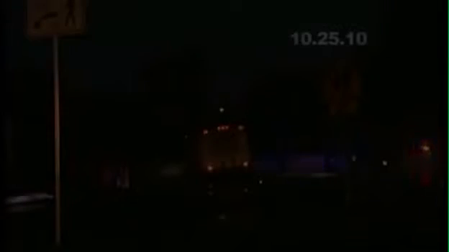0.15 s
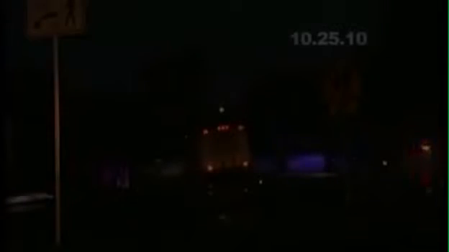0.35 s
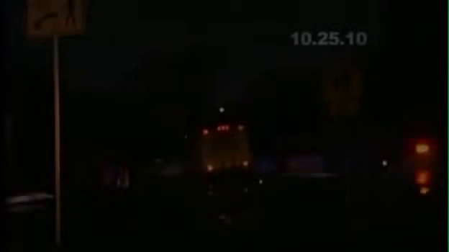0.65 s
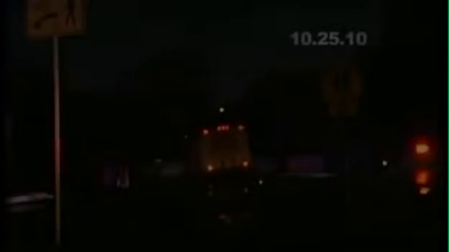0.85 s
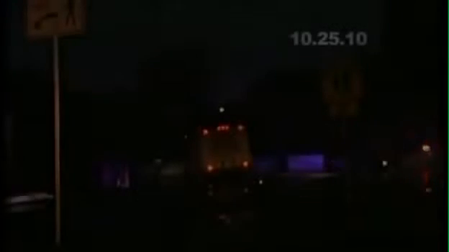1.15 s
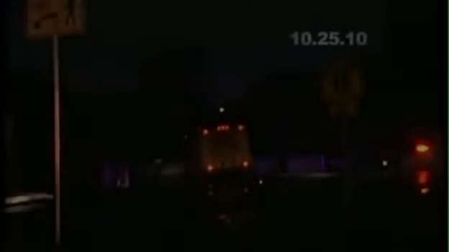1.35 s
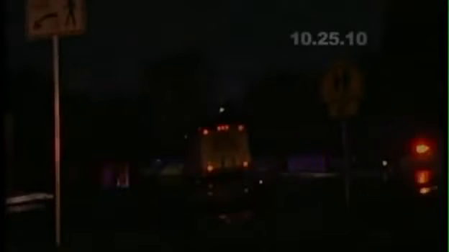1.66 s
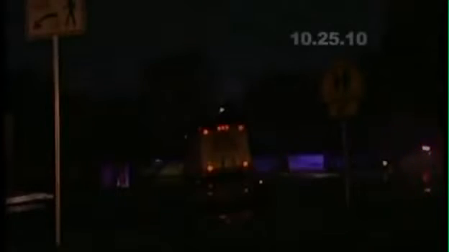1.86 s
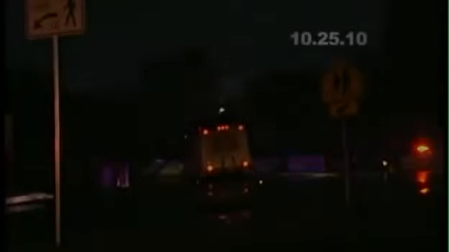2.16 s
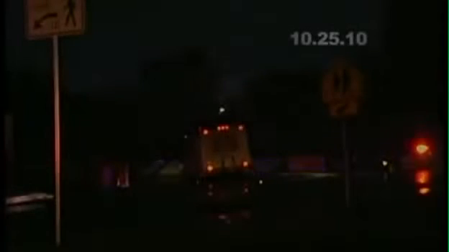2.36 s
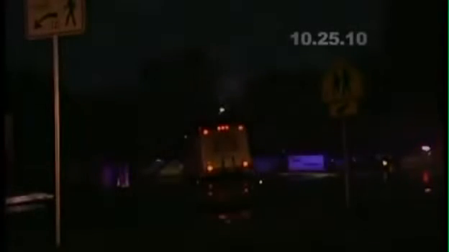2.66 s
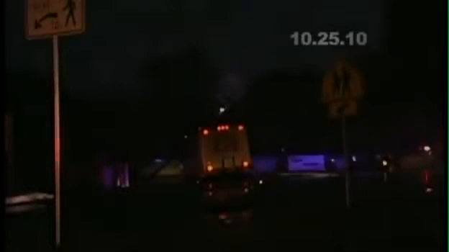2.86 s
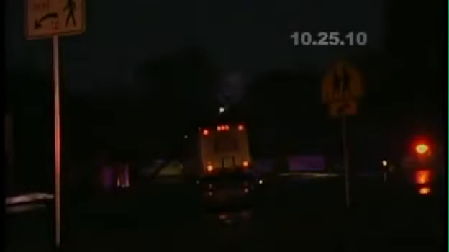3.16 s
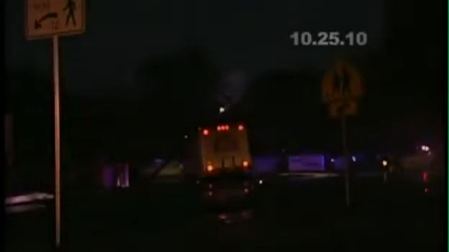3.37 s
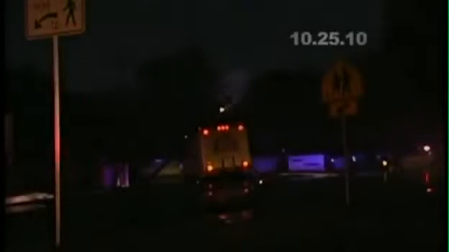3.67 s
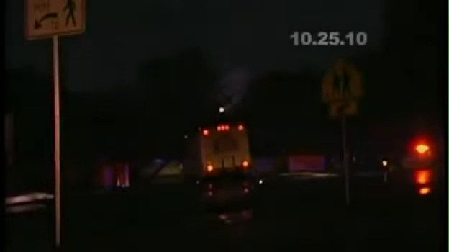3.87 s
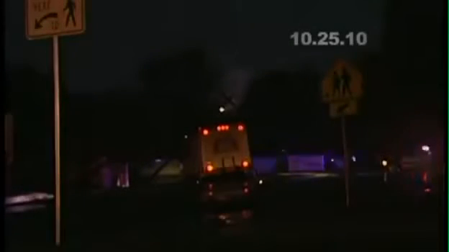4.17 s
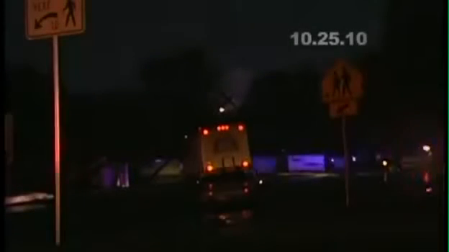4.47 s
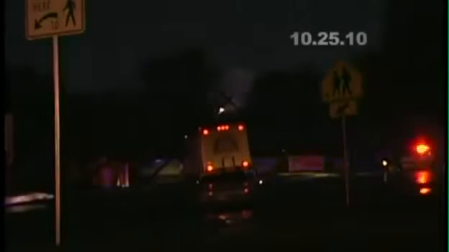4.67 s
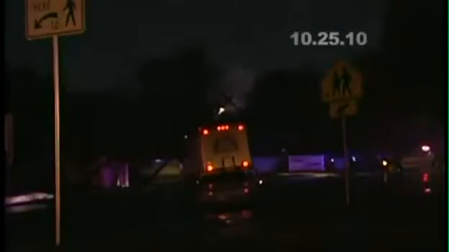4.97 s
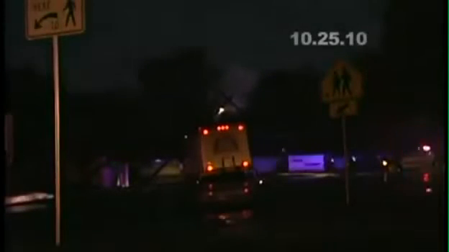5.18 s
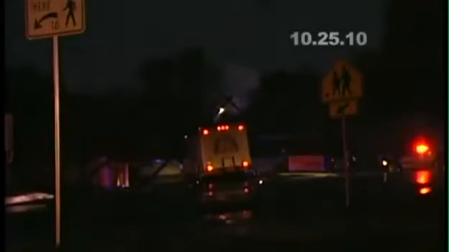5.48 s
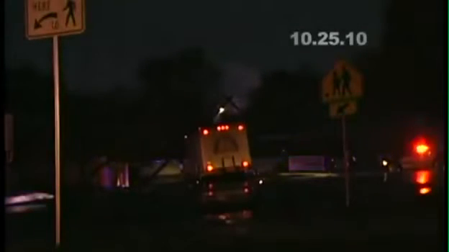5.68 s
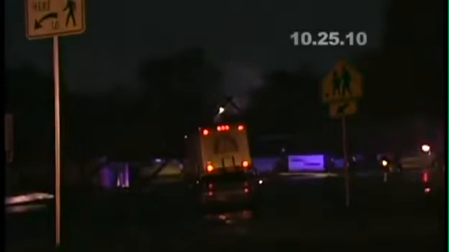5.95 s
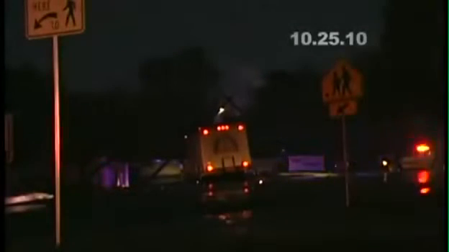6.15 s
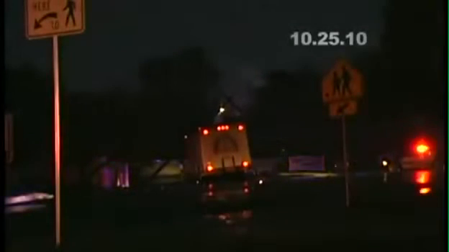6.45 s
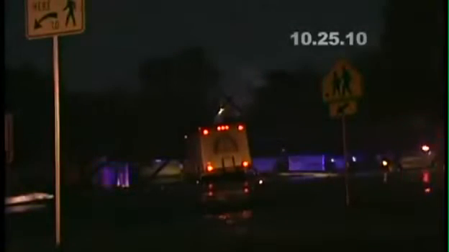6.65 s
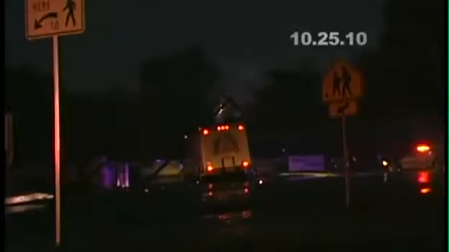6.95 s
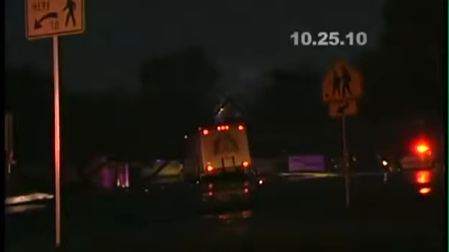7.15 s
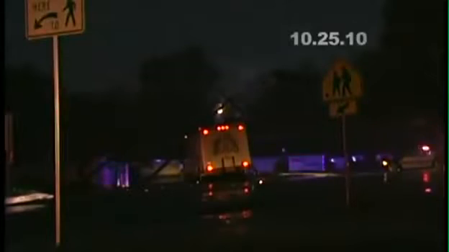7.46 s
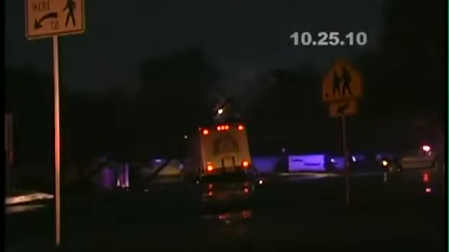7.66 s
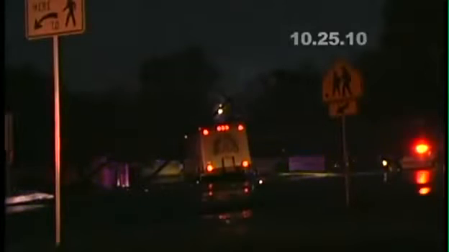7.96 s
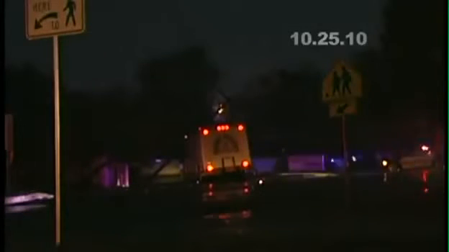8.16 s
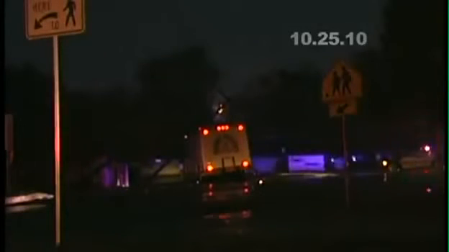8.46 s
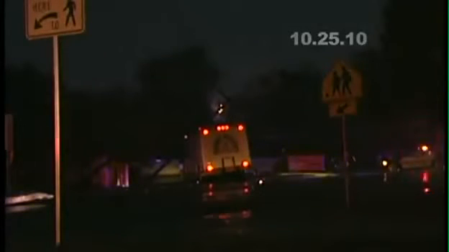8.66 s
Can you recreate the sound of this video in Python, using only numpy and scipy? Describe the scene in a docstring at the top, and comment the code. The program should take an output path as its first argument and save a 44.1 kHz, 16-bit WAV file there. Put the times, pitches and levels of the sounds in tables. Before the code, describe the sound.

At night on a wet street, a diesel truck idles steadily, its fast metallic clatter over low rumble and faint whines, a loose part knocking irregularly. Overhead a power line hisses and sizzles, briefly frying louder and giving single sharp snaps. Everything fades in steadily. Near the end comes a dull double thud like a vehicle door, with a light clack. One mono microphone, outdoors, short street echoes.

```python
"""A diesel truck idles on a wet street at night: it clatters at every firing and a loose part knocks.
Noise bursts make the clatter; tones and rumble make the exhaust, and thin tones the pumps and pulleys.
Overhead a power line sizzles, made of random sparks; the arc flares and snaps as single clicks.
Near the end, low ringing modes make a dull double thud, like a vehicle door; a few light clacks are heard.
One mono microphone hears it all, with echoes from the street, and the whole place fades in steadily."""
import sys
import numpy as np
from scipy import signal
from scipy.fft import rfft, irfft
from scipy.io import wavfile

SR = 44100
rng = np.random.default_rng(int(sys.argv[2]) if len(sys.argv) > 2 else 0)


def digitize_waveform(pressure):
    """Quantize a signal to 16-bit integers and store it at the path in sys.argv[1].

    Rows of a 2-D input are taken as channels; values are limited to [-1, 1].
    """
    field = np.atleast_2d(pressure).T
    bounded = np.clip(field, -1, 1)
    quanta = np.round(bounded * 32767).astype(np.int16)
    wavfile.write(sys.argv[1], SR, quanta)


N = 388962
T = np.arange(N) / SR  # time [s]

# Levels below are ahead of the fade-in; spectra give shape only, and each layer sets its own level.
# engine speed: time_s, firing_rate_hz
ENGINE_SPEED = [(0, 35.0), (4.7, 35.0), (4.9, 34.8), (6.5, 34.8), (6.7, 35.0), (8.82, 35.0)]
# broad colour of the engine's clatter: freq_hz, density_db (per Hz)
BLOCK_COLOUR = [(500, -53), (660, -31), (790, -16), (920, -14), (1150, -8), (1400, -9), (1850, -4.5),
                (2200, 1), (2600, -1.5), (2880, -4), (3150, -3), (3700, -9.5), (5000, -20), (9000, -44.5),
                (10500, -78)]
# ringing engine covers: centre_hz, width_hz, lift_db
COVER_RESONANCES = [(820, 14, 3.5), (1153, 26, 3), (1735, 50, 5.5), (1880, 40, -4), (2062, 36, 5.5),
                    (2634, 80, 3.5)]
# brief lulls in the clatter: centre_s, depth_db, length_s (from the middle to 1/e)
CLATTER_LULLS = [(0.952, -2.5, 0.012), (1.176, -5.5, 0.017), (1.687, -3, 0.012), (2.718, -4.5, 0.014),
                 (2.896, -6, 0.012), (3.73, -2.5, 0.016), (3.977, -6, 0.022), (4.727, -6.5, 0.014),
                 (5.133, -4.5, 0.016), (5.531, -4, 0.016), (6.296, -4, 0.015), (6.967, -3.5, 0.012)]
# knocks of a loose part: start_s, level_db, ring_hz (where it rings most), build_up_s
LOOSE_PART_KNOCKS = [(0.01, -39, 2460, 0.012), (0.236, -40, 2310, 0.016), (0.616, -39, 2350, 0.0081),
                     (0.71, -37, 2380, 0.005), (0.984, -39.0, 2080, 0.016), (1.211, -38, 2550, 0.017),
                     (1.438, -39, 2630, 0.011), (1.595, -34, 2230, 0.007), (2.146, -38.0, 2000, 0.005),
                     (2.194, -39, 2280, 0.016), (2.223, -40, 2200, 0.0063), (2.415, -32.5, 2380, 0.0084),
                     (2.639, -33.5, 2200, 0.012), (2.734, -36, 2260, 0.009), (2.763, -41, 2280, 0.017),
                     (2.91, -37, 2310, 0.0061), (3.015, -34.5, 2330, 0.009), (3.049, -37, 2250, 0.007),
                     (3.248, -38, 2330, 0.011), (3.393, -39.5, 2280, 0.016), (3.613, -39, 2530, 0.012),
                     (3.84, -34.5, 2300, 0.009), (3.939, -35.0, 2250, 0.005), (4.21, -35.0, 2510, 0.0095),
                     (4.817, -33, 2470, 0.0066), (5.421, -36, 2300, 0.013), (5.647, -36.5, 2480, 0.012),
                     (6.023, -34.5, 2550, 0.0064), (6.118, -35.5, 2230, 0.005), (6.175, -36.5, 2320, 0.005),
                     (6.596, -34.5, 2250, 0.012), (6.66, -36, 2500, 0.013), (6.72, -38, 2160, 0.006),
                     (6.82, -36, 2430, 0.012), (6.894, -37, 2160, 0.005), (6.978, -35.5, 2310, 0.0074),
                     (7.184, -36, 2260, 0.015), (7.418, -37.5, 2290, 0.016), (7.458, -37, 2290, 0.0086),
                     (7.568, -39, 2210, 0.012), (7.689, -39, 2300, 0.007), (7.798, -33.5, 2280, 0.0079),
                     (8.021, -35.5, 2280, 0.015), (8.431, -36, 2200, 0.005), (8.476, -37, 2490, 0.012),
                     (8.547, -37, 2160, 0.005), (8.619, -36.5, 2420, 0.016), (8.659, -37, 2400, 0.007),
                     (8.731, -41, 2090, 0.02)]
# exhaust tones: multiple (of the firing rate), level_db (rms, before swell and drone level)
EXHAUST_TONES = [(2, -62.5), (3, -63), (3.5, -63), (4, -58.5), (4.5, -69.5), (5, -69.5), (6.5, -66)]
# overall level of the exhaust tones: time_s, level_db (added)
DRONE_LEVEL = [(0, 0.5), (3.2, -2), (3.7, 0.5), (4.8, 1.5), (5.4, -0.5), (6.4, 0), (8.82, -0.5)]
# low rumble of the engine: freq_hz, density_db (per Hz)
RUMBLE_COLOUR = [(20, -25), (40, -22), (55, -13.5), (80, -4), (120, -1), (160, -1.5), (200, -5.5),
                 (300, -5), (400, -9.5), (520, -15.5), (640, -22), (1200, -28), (4000, -57.5),
                 (11000, -90.5)]
# whines of pumps and pulleys: pitch_hz, level_db (rms), waver_hz (rms)
PULLEY_WHINES = [(273, -58, 2.2), (400, -67.5, 2.2), (443.4, -70, 4), (548.3, -68.5, 3), (979, -68, 2.5),
                 (1012, -57, 3), (1032, -64, 3), (1170, -62, 3.4), (1327, -66, 3), (2083, -54, 6),
                 (2660, -61.5, 6)]
# hiss of the arc and the wet street, plus a faint separate band of treble near 13 kHz: freq_hz, density_db (per
# Hz)
SIZZLE_COLOUR = [(300, -22.5), (1000, 0), (2500, 7.5), (4200, 0.5), (5200, 1.5), (6500, -3.5), (8000, -8),
                 (9000, -15), (9700, -26), (10200, -53.5), (12100, -61.5), (13000, -36), (14500, -57),
                 (16500, -69.5)]
# flares of the arc: centre_s, level_db, length_s (from the middle to 1/e)
ARC_FLARES = [(0.70, -52, 0.22), (1.234, -44, 0.023), (1.384, -54, 0.05), (1.70, -52, 0.18),
              (3.90, -45, 0.081), (4.15, -48, 0.069), (5.15, -50, 0.078), (6.766, -53, 0.13)]
# colour of a flare: freq_hz, density_db (per Hz)
FLARE_COLOUR = [(1000, -25), (2200, -9), (3000, -5.5), (3700, 1), (4600, -14.5), (7000, -17), (9000, -32),
                (10500, -66)]
# sharp snaps of the arc: centre_s, peak_db, brightness (0 to 1)
ARC_SNAPS = [(2.2259, -16, 1), (2.9466, -23.5, 0), (3.4796, -24.5, 0.5), (3.5133, -35, 0.6),
             (4.882, -27, 0.2), (5.107, -33, 0.4), (5.1471, -28, 0.06), (8.7405, -34, 0.3)]
# colour of the brightest snap: freq_hz, density_db (per Hz)
BRIGHT_SNAP_COLOUR = [(2000, -31), (5000, -17), (6300, 3), (7500, 9), (9400, -1), (10100, -22),
                      (16200, -39)]
# colour of the dullest snap: freq_hz, density_db (per Hz)
DULL_SNAP_COLOUR = [(1000, -21), (2500, -8), (3800, 4), (5500, 1), (7500, -5), (8600, -10), (9700, -33),
                    (11000, -60)]
# blows on the door: start_s, peak_db (before the bass cut and the tail), centre_hz (excited most)
DOOR_BLOWS = [(8.259, -38, 310), (8.3385, -30, 175), (8.3486, -34, 82), (8.367, -31, 190),
              (8.419, -37.5, 200), (8.472, -42, 140)]
# modes of the door and cab: pitch_hz, level_db, t60_s
DOOR_MODES = [(55, 1, .1), (88, 1.5, .1), (119, 2.5, 0.085), (157, 0, 0.096), (199, -3.5, 0.098),
              (240, -8, .07), (314, -2.5, .07), (383, -3, 0.068)]
# light clacks and scuffs: centre_s, peak_db, centre_hz, length_s (from the middle to 1/e)
LIGHT_TAPS = [(2.137, -40, 2050, 0.009), (2.146, -37, 1200, 0.005), (2.164, -36, 660, 0.0025),
              (8.352, -33, 1310, 0.032)]


def amp(db):
    """Decibels to gain."""
    return 10 ** (np.asarray(db) / 20)


def evened(x):
    """Scales to rms 1."""
    return x / np.sqrt(np.mean(x ** 2) + 1e-20)


def read(points, hz):
    """Reads a spectrum in dB on a log-frequency axis."""
    f, value = np.transpose(points)
    return np.interp(np.log(hz + 1), np.log(f + 1), value)


def coloured(x, colour):
    """Filters x by a function from Hz to dB; rms 1."""
    gain = amp(colour(np.fft.rfftfreq(len(x), 1 / SR)))
    return evened(irfft(rfft(x) * gain, len(x)))


def drift(hz):
    """Slow random wander of rms 1: low-passed noise with its corner at hz."""
    step = 100  # samples between coarse points
    pole = np.exp(-2 * np.pi * hz * step / SR)
    coarse = signal.lfilter([1], [1, -pole], rng.standard_normal(N // step + 2))
    return evened(np.interp(np.arange(N) / step, np.arange(len(coarse)), coarse))


def bump(s, length):
    """A smooth rise and fall around time s."""
    return np.exp(-np.minimum(((T - s) / length) ** 2, 50))


def impacts(per_s, spread_db):
    """A random train of tiny clicks, a few much larger than the rest."""
    sizes = amp(spread_db * np.minimum(rng.exponential(1, N), 4)) * rng.choice([-1, 1], N)
    return sizes * (rng.random(N) < per_s / SR)


def add(mix, s, sound):
    """Mixes a sound in at time s."""
    part = mix[round(s * SR):][:len(sound)]
    part += sound[:len(part)]


def block_db(hz):
    """The engine's broad colour with the resonances of its covers."""
    covers = sum(db / (1 + (2 * (hz - f) / width) ** 2) for f, width, db in COVER_RESONANCES)
    return read(BLOCK_COLOUR, hz) + covers


def shaken(firings, lead, decay, wash, uneven_db):
    """Each firing shakes out a burst of tiny metal impacts; a steady wash of them fills the gaps."""
    # lead, age and decay are in firings
    count, age = np.divmod(firings + abs(lead), 1)
    strength = amp(uneven_db * rng.standard_normal(size=400))[count.astype(int)]
    burst = np.exp(-age / decay) * (1 - np.exp(-age / 0.13))
    return impacts(per_s=14000, spread_db=1.26) * (wash + strength * burst)


def clatter(firings, knock_db=-45, rattle_db=-41.0, split_hz=1800, limp_db=0.8, lope_db=0.65, throb_db=0.44):
    """Combustion knock, with every second firing stronger, under a brighter rattle that throbs and lulls."""
    def low_db(hz):
        return block_db(hz) - 10 * np.log10(1 + (hz / split_hz) ** 12)

    def high_db(hz):
        return block_db(hz) - 10 * np.log10(1 + (split_hz / (hz + 1)) ** 12)

    cylinder_db = limp_db * np.cos(np.pi * firings) + lope_db * drift(hz=2.4)
    lulls_db = sum(db * bump(s, length) for s, db, length in CLATTER_LULLS)
    swell_db = throb_db * drift(hz=11) + lulls_db
    knock = shaken(firings, lead=0.13, decay=0.81, wash=1.2, uneven_db=1.0) * amp(cylinder_db)
    rattle = shaken(firings, lead=0.08, decay=0.35, wash=0.86, uneven_db=2.5) * amp(swell_db)
    return amp(knock_db) * coloured(knock, low_db) + amp(rattle_db) * coloured(rattle, high_db)


def chatter(ring_hz, rise, focus_db=9.0, octaves=0.33):
    """One knock: a brief burst of noise rings one region of the engine most."""
    def colour_db(hz):
        distance = np.log2((hz + 1) / ring_hz) / octaves
        return block_db(hz) + focus_db * np.exp(-distance ** 2)

    t = np.arange(8192) / SR
    ring = coloured(rng.standard_normal(len(t)), colour_db)
    return ring * (t / rise * np.exp(1 - t / rise)) ** 1.7  # loudest at t = rise


def knocks():
    """A loose part chatters against the engine."""
    out = np.zeros(N)
    for s, db, ring_hz, rise in LOOSE_PART_KNOCKS:
        add(out, s, amp(db) * chatter(ring_hz, rise))
    return out


def drone(firings, rumble_db=-51.0, pulsing=0.14, swell_db=1.8, wobble_turns=0.058):
    """Unsteady exhaust tones over a rumble that pulses with the firings."""
    tones = np.zeros(N)
    for k, db in EXHAUST_TONES:
        multiple = np.round(2 * k) / 2  # whole and half multiples only
        turns = multiple * firings + rng.random() + wobble_turns * drift(hz=3.3)
        tones += amp(db + swell_db * drift(hz=4)) * np.sqrt(2) * np.sin(2 * np.pi * turns)
    tones *= amp(np.interp(T, *np.transpose(DRONE_LEVEL)))
    puffs = rng.standard_normal(N) * (1 + pulsing * np.cos(2 * np.pi * firings))
    return tones + amp(rumble_db) * coloured(puffs, lambda hz: read(RUMBLE_COLOUR, hz))


def whines(flutter_db=3.5, flutter_hz=7):
    """Thin tones of turning parts, unsteady in pitch and level."""
    out = np.zeros(N)
    for hz, db, waver in PULLEY_WHINES:
        turns = np.cumsum(hz + waver * drift(hz=6.99)) / SR
        tone = np.sin(2 * np.pi * turns) * amp(flutter_db * drift(hz=flutter_hz))
        out += amp(db) * evened(tone)
    return out


def thuds(rise=0.006, octaves=0.86, cut_hz=52):
    """Soft blows ring the low modes of a door, each around its own pitch."""
    out, t = np.zeros(N), np.arange(SR // 3) / SR
    for s, peak_db, centre_hz in DOOR_BLOWS:
        ring = np.zeros(len(t))
        for hz, db, t60 in DOOR_MODES:
            excitation = np.exp(-(np.log2(hz / centre_hz) / octaves) ** 2)
            ring += amp(db - 60 * t / t60) * excitation * np.sin(2 * np.pi * hz * t)
        ring *= 1 - np.exp(-(t / rise) ** 2)
        add(out, s, amp(peak_db) * ring / abs(ring).max())
    # a panel this size radiates little deep bass
    return signal.sosfilt(signal.butter(2, cut_hz, "highpass", fs=SR, output="sos"), out)


def taps(octaves=0.74):
    """Short dull clacks: noise grains, 6 dB down at the given octaves either side of the centre."""
    out, t = np.zeros(N), np.arange(-4096, 4096) / SR
    for s, db, centre_hz, length in LIGHT_TAPS:
        noise = rng.standard_normal(len(t))
        grain = coloured(noise, lambda hz: -6 * (np.log2((hz + 1) / centre_hz) / octaves) ** 2)
        grain *= np.exp(-(t / length) ** 2)
        add(out, s + t[0], amp(db) * grain / abs(grain).max())
    return out


def snaps():
    """Single sparks: very short clicks, from bright to dull."""
    out = np.zeros(N)
    for s, db, brightness in ARC_SNAPS:
        bright = np.clip(brightness, 0, 1)

        def colour_db(hz):
            return bright * read(BRIGHT_SNAP_COLOUR, hz) + (1 - bright) * read(DULL_SNAP_COLOUR, hz)

        click = coloured(signal.unit_impulse(256, "mid"), colour_db)
        add(out, s - len(click) / 2 / SR, amp(db) * click / abs(click).max())
    return out


def flares():
    """Short spells of frying: sparks of very unequal size swell up and die away."""
    strength = sum(amp(db) * bump(s, length) for s, db, length in ARC_FLARES)
    sparks = impacts(per_s=5000, spread_db=5.5)
    return strength * coloured(sparks, lambda hz: read(FLARE_COLOUR, hz))


def sizzle(level_db=-45.0, flicker_db=0.94):
    """Thousands of tiny sparks and drops merge into a flickering hiss."""
    sparks = impacts(per_s=9000, spread_db=1.0) * amp(flicker_db * drift(hz=4.2))
    return amp(level_db) * coloured(sparks, lambda hz: read(SIZZLE_COLOUR, hz))


def street(x, wet_db=-13, t60=0.36):
    """Scattered echoes from vehicles and house fronts ripple the spectrum."""
    delays = rng.uniform(.004, .12, size=40)  # s: detours of roughly 1 to 40 m
    echoes = np.zeros(SR // 4)
    echoes[(delays * SR).astype(int)] = rng.choice([-1, 1], len(delays)) * amp(-60 * delays / t60)
    wet = signal.oaconvolve(x, echoes / np.linalg.norm(echoes))[:N]
    return (x + amp(wet_db) * wet) / np.hypot(1, amp(wet_db))


def boom(x, tail_db=-8.0, t60=0.45, centre_hz=160):
    """The street rolls a low blow on as a dull, diffuse tail."""
    t = np.arange(SR // 2) / SR
    tail = rng.standard_normal(len(t)) * amp(-60 * t / t60) * (1 - np.exp(-t / 0.02))
    echo = signal.oaconvolve(x, tail / np.linalg.norm(tail))[:N]
    return x + amp(tail_db) * signal.lfilter(*signal.iirpeak(centre_hz, 1, SR), echo)


def scene():
    """The idling truck, the arc, the thuds and the clacks, at one mono microphone."""
    firings = np.cumsum(np.interp(T, *np.transpose(ENGINE_SPEED))) / SR  # running count
    truck = street(clatter(firings) + knocks()) + drone(firings) + whines()
    arc = sizzle() + flares() + snaps()
    return (truck + arc + boom(thuds()) + taps())[None]


def record(dry, start_gain=0.29, edge_hz=16500):
    """A straight fade-in to full gain, then a steep low-pass at edge_hz."""
    faded = dry * np.linspace(start_gain, 1, N)
    lowpass = signal.firwin(255, edge_hz, window=("kaiser", 8), fs=SR)
    return signal.oaconvolve(faded, lowpass[None], "same")


dry = scene()
out = record(dry)
digitize_waveform(out)
```